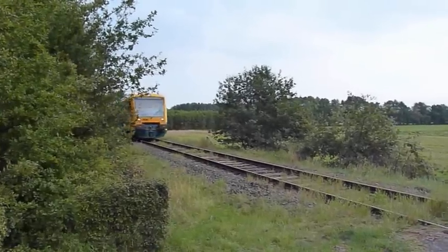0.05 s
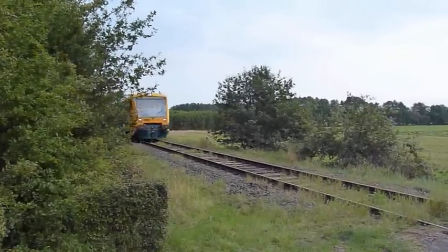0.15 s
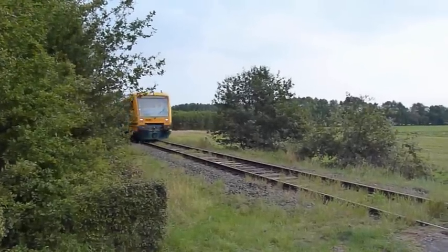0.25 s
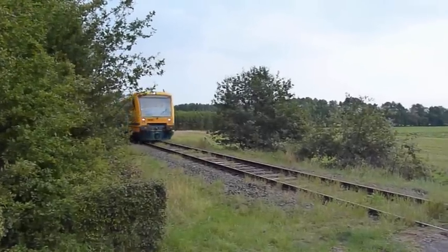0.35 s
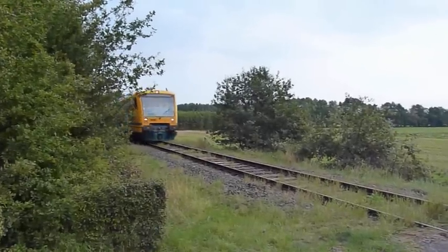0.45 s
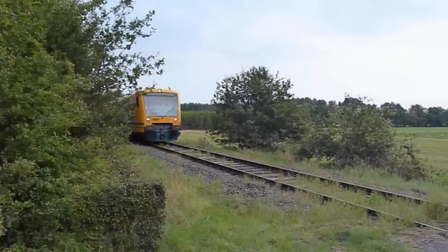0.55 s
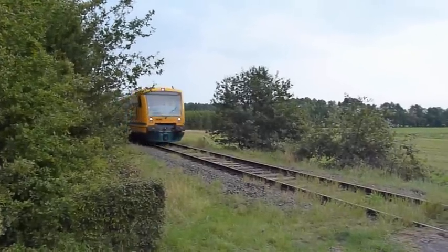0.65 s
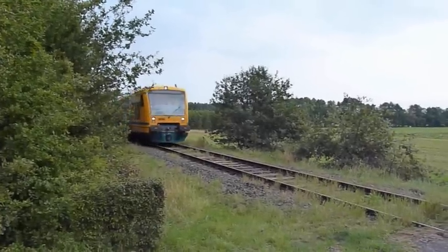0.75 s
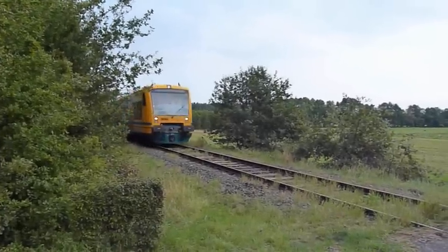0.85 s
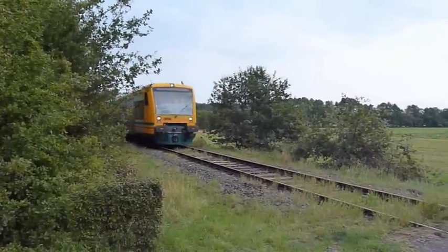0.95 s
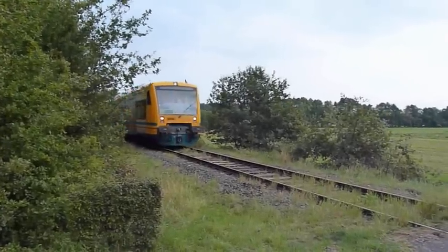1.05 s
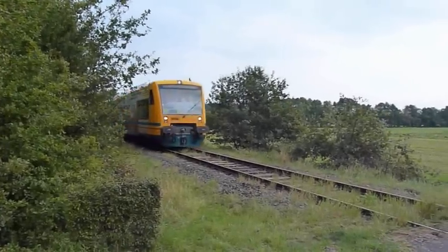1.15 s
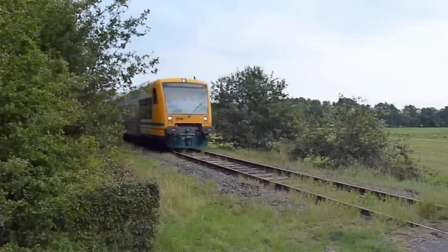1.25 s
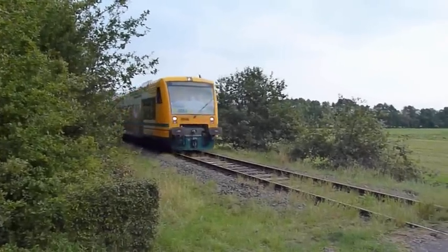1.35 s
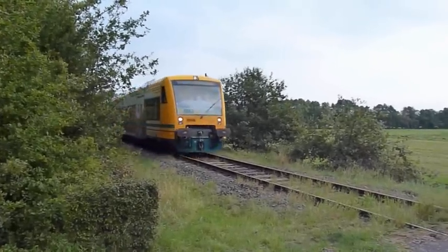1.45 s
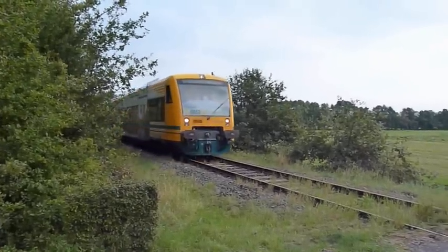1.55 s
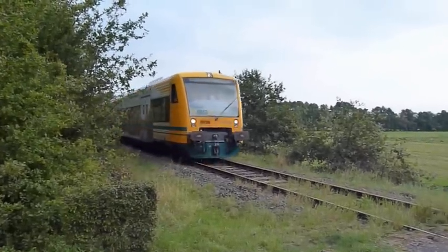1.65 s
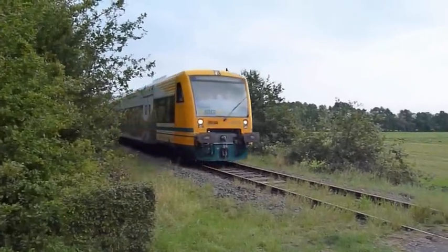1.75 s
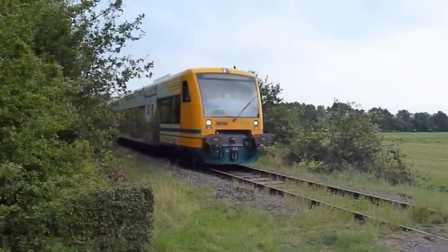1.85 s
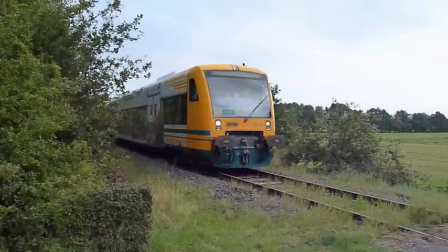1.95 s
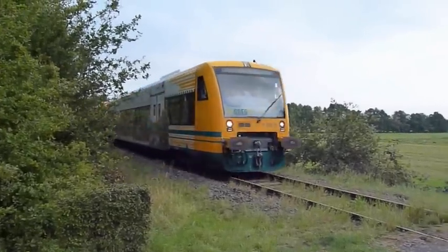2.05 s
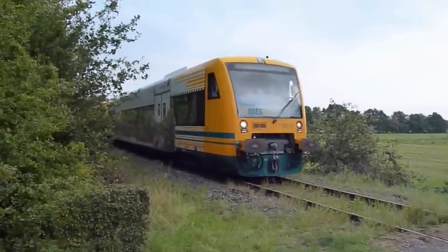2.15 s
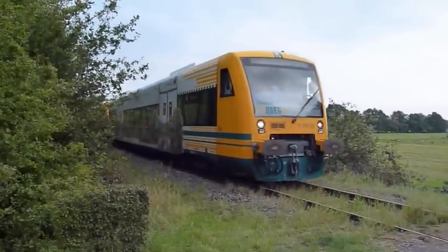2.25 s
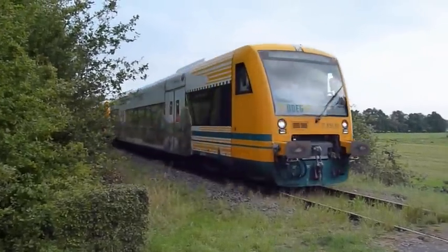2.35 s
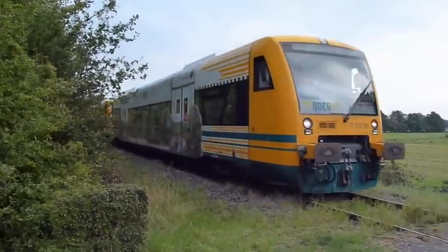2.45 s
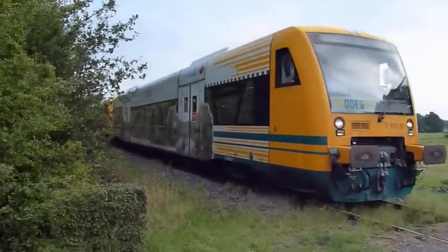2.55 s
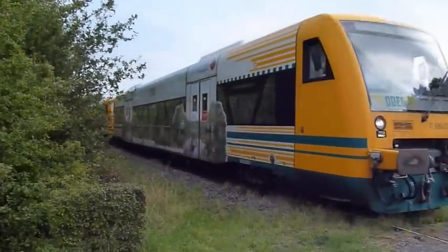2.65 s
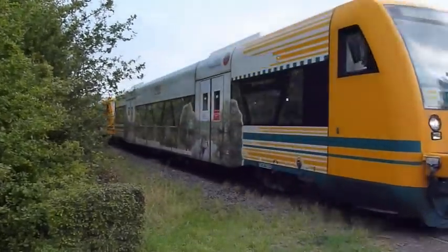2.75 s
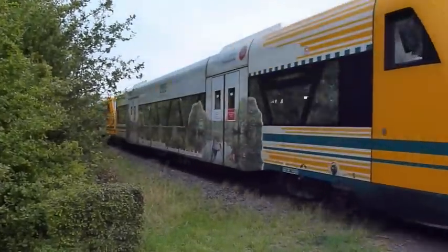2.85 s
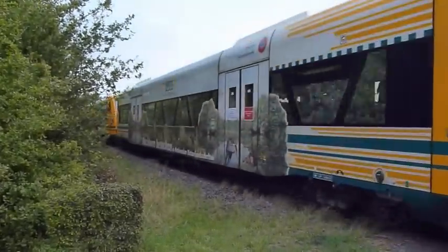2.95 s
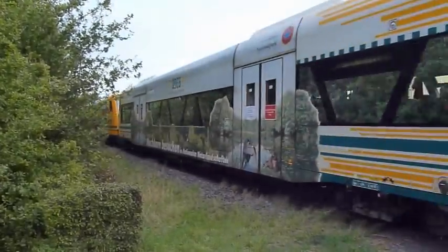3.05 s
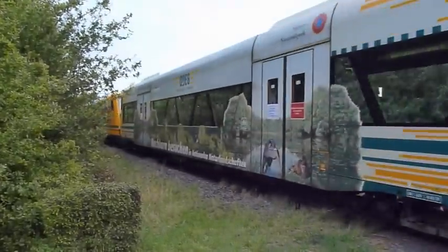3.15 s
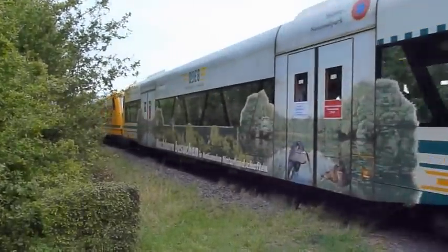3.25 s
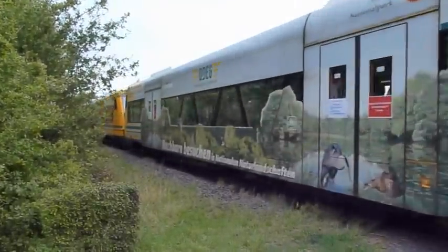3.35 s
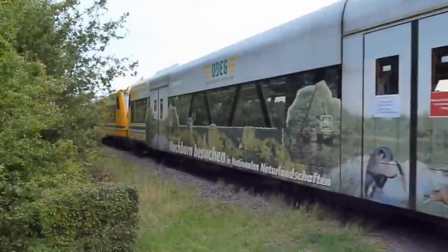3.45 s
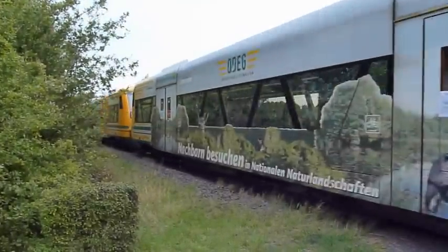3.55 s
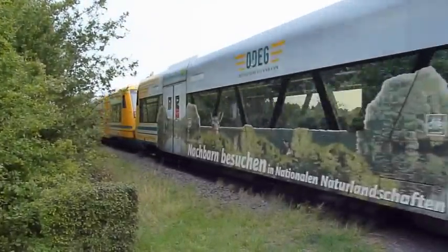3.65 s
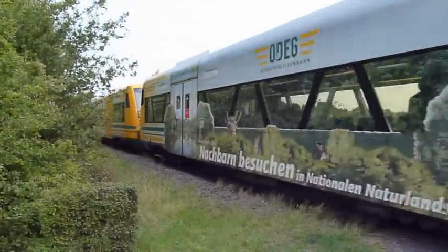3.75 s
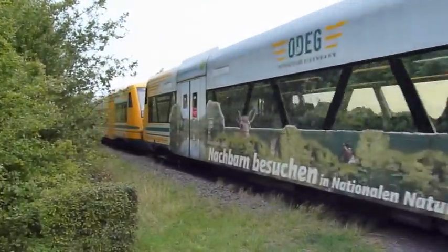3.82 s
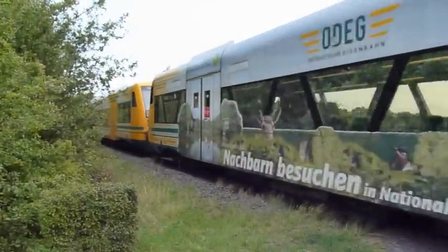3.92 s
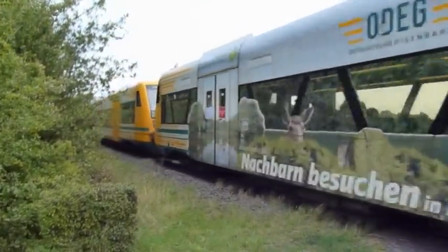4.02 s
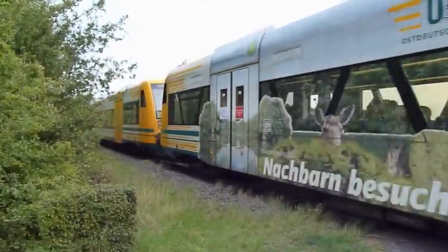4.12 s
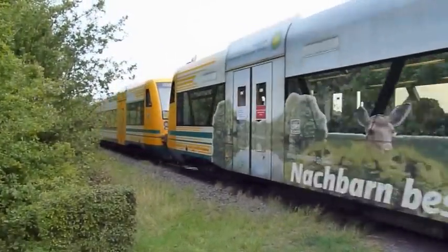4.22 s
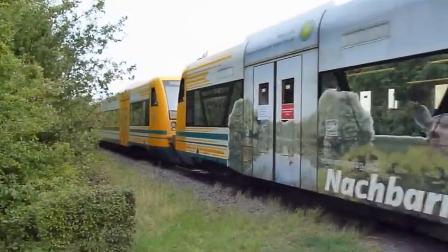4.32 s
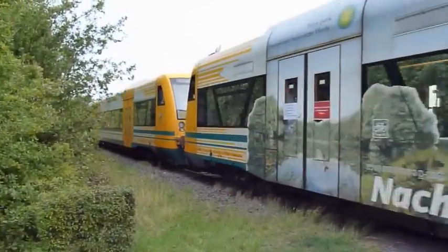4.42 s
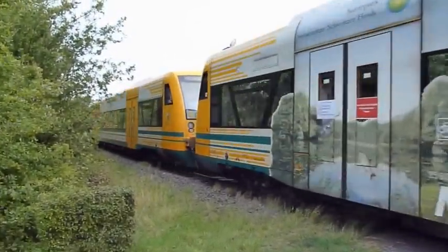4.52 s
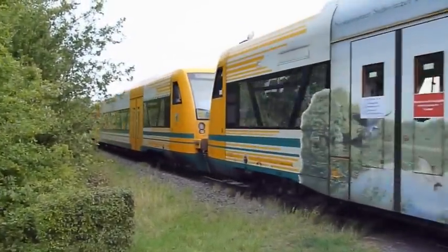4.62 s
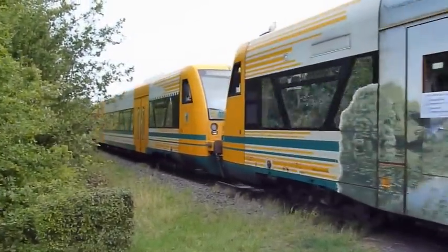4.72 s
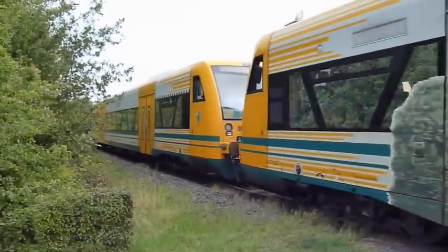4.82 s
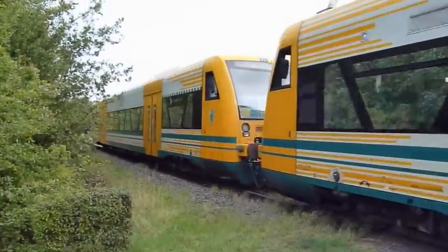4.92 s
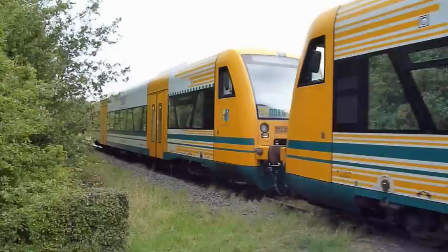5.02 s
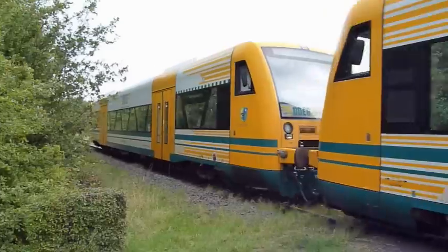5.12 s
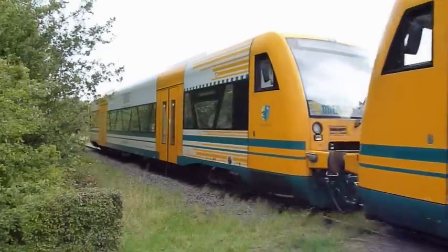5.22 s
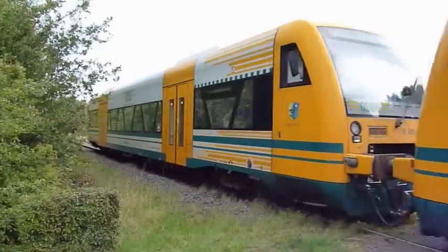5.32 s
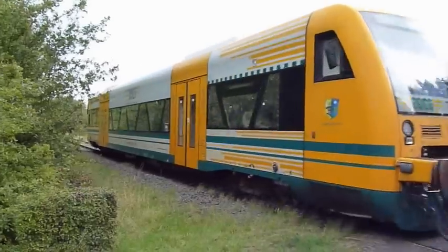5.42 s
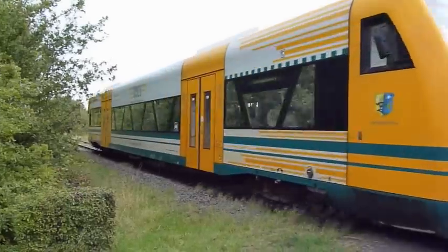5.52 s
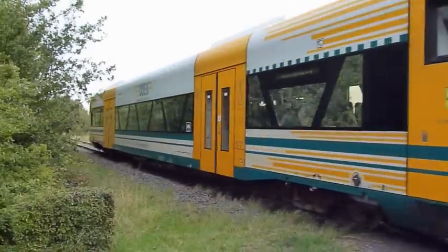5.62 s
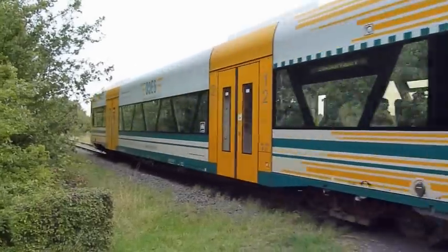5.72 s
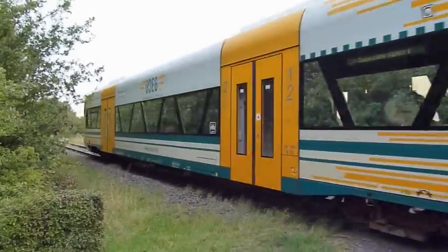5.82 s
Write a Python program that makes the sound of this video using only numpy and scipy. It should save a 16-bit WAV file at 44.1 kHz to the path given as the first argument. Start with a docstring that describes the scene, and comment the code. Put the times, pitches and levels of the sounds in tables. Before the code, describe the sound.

Outdoors beside a rural railway, a camcorder a few metres from the track hears diesel railcars approach from the left. From 0 to 2 s a low throbbing engine drone and pulsing exhaust lie under a growing hollow rail roar, with thin wavering metallic ringing and treble hiss. From about 2.4 s it swells fast, with a high flange scrape building; the front draws level near 3 s and pitch sinks slightly. Between 2.7 and 4.7 s, irregular dull thumps knock in quick succession, with clacks and short, sharp scrapes clustered at 3.1 to 3.8 s. Around 4 s floor panels drum and the engine swells. Near 5 s the next wheels pass with another roar surge, clacks and thumps. From 5.2 to 5.8 s small bright cracks of grit and a faint scrape join the rumble, now towards the right. It ends still loud, the top treble cut off.

```python
"""A rural branch line: two coupled diesel railcars approach and pass a few metres from a camcorder.
Noise shaped by each part's spectrum gives rail roar, sleeper rumble, wheel ring and tread hiss.
Short ringing blows make the thumps; bursts of shaped noise make clacks, scrapes and cracking grit.
Underfloor engines drone beneath as sine lines at multiples of the firing rate, with pulsing exhaust noise.
The train pans from left to right; the camcorder adds three fixed notches and cuts the top treble."""
import sys
import numpy as np
from scipy import signal
from scipy.fft import rfft, irfft
from scipy.io import wavfile
from scipy.ndimage import uniform_filter1d, map_coordinates

SR = 44100
rng = np.random.default_rng(int(sys.argv[2]) if len(sys.argv) > 2 else 0)


def persist_wave(psi):
    """Save psi, clipped to +-1, as 16-bit WAV."""
    counts = np.round(np.clip(psi, -1, 1) * 32767).astype(np.int16)
    wavfile.write(sys.argv[1], SR, np.atleast_2d(counts).T)


N = 259308
TIME = np.arange(N) / SR
FREQS = np.maximum(np.fft.rfftfreq(N, 1 / SR), 1)

SPEED_M_S, TRACK_M = 9.86, 4.82  # speed of the train, distance to the rails
SOUND_M_S = 343
FIRING_HZ = 59.43  # engine firing rate as heard at the start, before it wanders
# Tone colour of rails, sleepers and hiss, far off and alongside: [f/Hz, relative level per Hz/dB]
RAIL_AHEAD = [(380, -21), (460, -6.5), (540, -4), (660, -2), (750, -1.5), (840, -2.5), (900, -8.5),
              (1040, -3), (1170, -9.5), (1330, -9.5), (1600, -27)]
RAIL_BESIDE = [(380, -1.5), (460, -9), (545, 4), (680, -1), (800, 1.5), (900, -1), (975, -0.5), (1100, -3),
               (1205, -4.5), (1330, -14.5), (1600, -22.5)]
SLEEPERS_AHEAD = [(60, -20.5), (105, -7.5), (140, 2), (215, 0), (280, -1.5), (330, -5), (450, -15.5),
                  (700, -33.5)]
SLEEPERS_BESIDE = [(60, -26.5), (105, -11), (160, 0.5), (205, 1), (250, 3), (310, -2), (400, -3.5),
                   (500, -20), (750, -27.5)]
HISS_AHEAD = [(2000, -9.5), (2700, 2.5), (3100, -2), (3500, 0), (4200, -3), (4900, -7.5), (5350, -3),
              (5750, 0), (6400, -7.5), (7600, -15)]
HISS_BESIDE = [(2000, -17), (2800, 3), (3400, -1), (4200, 0.5), (4800, -1), (5150, 1), (5800, -4),
               (6500, -2.5), (7600, -11)]
# Tone colour of wheel webs, exhaust gas and floor panels: [f/Hz, relative level per Hz/dB]
WHEEL_WEB = [(950, -13.5), (1150, 2.5), (1320, -0.5), (1550, -3.5), (1780, -8.5), (2020, -2), (2180, -8.5),
             (2350, -16), (2600, -24.5), (3200, -46.5)]
EXHAUST = [(20, -22), (38, -7), (58, 1), (73, 2.5), (100, -1), (160, -10.5), (300, -25.5), (700, -55)]
FLOOR_PANELS = [(90, -16), (150, 0), (200, -2.5), (260, -15.5), (330, -1.5), (390, 0.5), (470, 0),
                (560, -12), (700, -14)]
# Ringing modes of the wheels: [f/Hz, width/Hz, relative level/dB]
WHEEL_MODES = [(2070, 110, 2), (3030, 78, 0.5), (3960, 49, -2)]
# Narrow ringing of rails and wheels heard ahead of the train: [f/Hz, width/Hz, level/dB]
AHEAD_MODES = [(618, 24, -28), (674, 14, -28.5), (3100, 110, -50), (5440, 100, -48.5)]
# Engine lines: [multiple of the firing rate, relative level/dB]
ENGINE_ORDERS = [(1, 4.5), (1.25, -6.5), (2, -2.5), (2.671, -16), (4, -13), (5, -8)]
# Bogies, each with its engine: [t abreast/s, then base level/dB of rumble, roar, web, hiss, engine]
BOGIES = [(3.02, -22.5, -20.5, -27, -39.5, -39.5), (5.0, -23, -21, -29, -41, -40),
          (5.83, -25.5, -24, -26.5, -39, -41.5)]
# Thumps of worn treads: [t/s, level before a common trim/dB, f where the blow is strongest/Hz]
THUMPS = [(2.70, -10.5, 210), (2.755, -13.5, 240), (3.131, -4.5, 240), (3.352, -4, 262),
          (3.413, -11.5, 230), (3.461, -6.5, 270), (3.536, -5, 231), (3.623, -5.5, 270), (3.766, -3, 210),
          (3.966, -3.5, 320), (4.021, -6, 393), (4.211, -3, 338), (4.266, -5.5, 280), (4.446, -5, 352),
          (4.507, -8.5, 306), (4.701, -6, 215), (5.209, -10.5, 250), (5.244, -8, 296), (5.293, -5.5, 280),
          (5.512, -6.5, 242), (5.565, -8, 358)]
# What a thump rings in bogie and track: [f before detuning/Hz, relative level/dB, t60/s]
BOGIE_MODES = [(155.7, -3, .11), (205, -2, .08), (249.5, -3, .14), (322.8, -1, .11), (391, -2, .08),
               (465, -1, .09), (560, -2, .08), (672, 1, .07)]
# Flange scrapes: [t at lift-off/s, length/s, f at lift-off/Hz, width/Hz, level/dB]
SCRAPES = [(3.35, .95, 5640, 150, -43.5), (3.13, .09, 5950, 600, -47), (3.35, .14, 5250, 300, -46.5),
           (3.35, .4, 2950, 200, -46), (3.465, .06, 5850, 350, -46), (3.558, .07, 5900, 400, -44.5),
           (3.603, .008, 5900, 400, -44), (3.668, .03, 5900, 330, -37.5), (3.693, .025, 6000, 380, -40),
           (3.75, .017, 6150, 520, -34.5), (3.78, .035, 5950, 300, -39), (5.74, .35, 5130, 200, -48)]
# Wheels clacking on the rail head: [t/s, level before the burst's rise and decay/dB]
CLACKS = [(2.712, -18), (2.94, -19), (2.957, -17), (3.012, -18), (3.073, -18), (3.13, -13.5), (3.324, -9),
          (3.527, -13), (3.722, -14), (4.113, -12), (4.691, -13.5), (4.755, -18), (4.857, -13),
          (4.919, -12.5), (4.974, -14.5), (5.12, -13.5), (5.248, -25)]
# Rough patches of rail that make the roar surge: [t at the height/s, half length/s, boost/dB]
SURGES = [(2.948, .026, 1.5), (3.095, 0.034, 1), (3.29, 0.021, 3), (4.68, 0.037, 1), (5.148, 0.039, 3)]
# Parts of body and running gear that boom going by: [t abreast/s, f/Hz, width/Hz, level/dB]
BOOMS = [(3.0, 713, 129.3, -25), (3.6, 251, 59.3, -21), (4.47, 374, 110, -25.5), (4.72, 1247, 169, -27),
         (5.33, 273, 59.4, -23.5), (5.72, 970, 69.6, -28.5)]
# Grit cracking under the wheels: [t/s, f/Hz, level at onset/dB]
TICKS = [(5.213, 7000, -40.5), (5.248, 6500, -37), (5.352, 6200, -39), (5.529, 4900, -32.5),
         (5.634, 4300, -32), (5.668, 5000, -37), (5.69, 6700, -38), (5.705, 5100, -35.5),
         (5.74, 5000, -36.5), (5.794, 4000, -37)]
# Level moves of the wheels' singing: [t/s, level/dB]
WHEEL_LEVEL = [(3.05, -1.5), (3.32, -2), (3.39, -2), (3.79, -2.5), (3.89, 2.5), (4.45, -1), (4.72, -1.5),
               (5.12, 0.5), (5.42, -1), (5.7, -1.5)]
# Drone level, sinking behind the front skirts, swelling under the first car's rear: [t/s, level/dB]
DRONE_LEVEL = [(.3, 0.5), (1.1, 2), (1.6, 0), (1.95, 2.5), (2.7, -1), (3.0, -2), (3.45, -1.5), (3.75, 2.5),
               (4.1, 0), (4.75, 2), (5.05, 0.5), (5.25, -2), (5.8, 2.5)]
# How much of the left-right bearing each wavelength shows: [f/Hz, share 0-1]
SHADOW = [(250, .03), (800, .3), (1700, .72), (3400, 1)]
# Unlikeness of the two microphone signals: [f/Hz, side minus mid level/dB]
SPREAD = [(50, -21), (130, -30), (300, -31.5), (600, -25), (1000, -18), (1350, -14), (1750, -4.5),
          (2050, -9.5), (2500, -1), (4000, -4), (7000, -3)]
# Microphone sensitivity: [f/Hz, left minus right level/dB]
SHADING = [(50, -.7), (300, -.7), (700, -.6), (1200, -.7), (2000, -.9), (4000, 0)]
# Camcorder notches: [f/Hz, width/Hz]
NOTCHES = [(2600, 330), (4600, 520), (5435, 190)]
# How each part carries: [loss per doubling of distance/dB, level far ahead minus abreast/dB]
SLEEPER_SPREAD = (6.47, -2.6)
RAIL_SPREAD = (5.06, -0.33)
WEB_SPREAD = (5.5, 3.3)
HISS_SPREAD = (4.6, 0.58)
AHEAD_SPREAD = (6.7, 0)
ENGINE_SPREAD = (4.86, 8.8)
BOOM_SPREAD = (34, 0)


def undb(db):
    """Decibels to gain."""
    return 10 ** (np.asarray(db) / 20)


def unit(x):
    """Scale to rms 1."""
    return x / np.sqrt(np.mean(x ** 2))


def across(points):
    """Spread (Hz, value) points over all frequencies, evenly per octave."""
    hz, value = np.transpose(points)
    return np.interp(np.log(FREQS), np.log(hz), value)


def over_time(points):
    """Gain that follows (s, dB) points."""
    return undb(np.interp(TIME, *np.transpose(points)))


def colour(points):
    """Gain of a (Hz, dB) spectrum that falls away beyond its ends."""
    hz = np.transpose(points)[0]
    skirt = np.minimum(FREQS / hz.min(), 1) * np.minimum(hz.max() / FREQS, 1)
    return undb(across(points)) * skirt ** 4


def resonance(hz, width):
    """Gain of a single steep-sided resonance."""
    return 1 / (1 + ((FREQS - hz) / width) ** 2)


def walk(rate):
    """Random levels held 1 / rate s and smoothed twice; rms 1."""
    k = int(SR / rate)
    steps = np.repeat(rng.standard_normal(N // k + 1), k)
    smooth = uniform_filter1d(uniform_filter1d(steps, k), k)
    return unit(smooth[:N])


def radiate(gain, drive=1):
    """Random force through a response; short waves reach the two microphones unalike."""
    noise = rng.standard_normal((2, N)) * drive
    mid, side = rfft(noise) * gain
    side = side * undb(across(SPREAD))
    return irfft(np.array([mid + side, mid - side]), N) / np.std(irfft(mid, N))


def glide(x, factor):
    """Shift all frequencies of both channels by a changing factor."""
    read_at = np.cumsum(factor) % (N - 1)
    return np.array([map_coordinates(ear, [read_at], order=3) for ear in x])


def along(abreast_s):
    """Metres travelled past the camcorder, one row per source."""
    return SPEED_M_S * (TIME - np.reshape(abreast_s, (-1, 1)))


def go_by(abreast_s, db, spread):
    """Joint gain of moving sources: each weakens with distance and throws its sound ahead or behind."""
    fall_db, ahead_db = spread
    metres = along(abreast_s)
    distance = np.hypot(metres, TRACK_M)
    loss_db = fall_db * np.log2(distance / TRACK_M)
    gain = undb(np.reshape(db, (-1, 1)) - loss_db - ahead_db * metres / distance)
    return np.sqrt(np.sum(gain ** 2, axis=0))


def doppler_shift(abreast_s, recede=.65):
    """Pitch sinks as the front draws level; wheels still to come then hold it up."""
    metres, = along(abreast_s)
    return 1 - SPEED_M_S / SOUND_M_S * np.minimum(metres / np.hypot(metres, TRACK_M), recede)


def nearness_of_colour(centre_s=3.46, rise_s=0.74, far=0.064, near=0.88):
    """Share of the alongside colour, rising gently as the train reaches the near track."""
    return far + (near - far) * (1 + np.tanh((TIME - centre_s) / rise_s)) / 2


def passing(ahead, beside, share, drive):
    """Crossfade, at equal power, from the far-off colour to the alongside one."""
    far = np.sqrt(1 - share) * radiate(colour(ahead), drive)
    return far + np.sqrt(share) * radiate(colour(beside), drive)


def contact(rough_db=0.5, grit_db=0.78):
    """Strength of the wheel-rail force: it shakes slowly and quickly on rough steel."""
    return undb(rough_db * walk(23.66) + grit_db * walk(300))


def sleeper_rumble(share, force, lump_db=-0.1, drift=.07):
    """Unevenly bedded sleepers rumble in slight lumps and with wandering pitch."""
    lumpy_force = force * undb(lump_db * walk(25))
    rumble = passing(SLEEPERS_AHEAD, SLEEPERS_BESIDE, share, lumpy_force)
    return glide(rumble, 1 + drift * walk(12))


def surges():
    """Gain of the rail roar: it swells briefly on each rough patch."""
    return undb(sum(db * np.exp(-((TIME - s) / half) ** 2) for s, half, db in SURGES))


def rail_roar(share, force):
    """Rough wheels shake the rails into a broad roar that surges on rough patches."""
    return surges() * passing(RAIL_AHEAD, RAIL_BESIDE, share, force)


def wheel_webs(force):
    """The contact force shakes the wheel webs into a mid-treble noise."""
    return radiate(colour(WHEEL_WEB), force)


def tread_hiss(share, force):
    """The wheel-rail contact gives off a treble hiss whose colour changes on approach."""
    return passing(HISS_AHEAD, HISS_BESIDE, share, force)


def wheel_ring(doppler, force, waver_db=-2.0):
    """Narrow wheel modes sing on and sink in pitch as the train draws level."""
    modes = sum(undb(db) * resonance(hz, width) for hz, width, db in WHEEL_MODES)
    return glide(radiate(modes, force), doppler) * undb(waver_db * walk(9.5))


def ringing_ahead(abreast_s, doppler, fade_s=0.69, waver_db=2.5):
    """Narrow rail and wheel modes sound before the train arrives, each wavering, gone once it is level."""
    ahead = np.clip((abreast_s - TIME) / fade_s, 0, 1)
    modes = 0
    for hz, width, db in AHEAD_MODES:
        modes = modes + undb(db + waver_db * walk(5)) * radiate(resonance(hz, width))
    return ahead * go_by(abreast_s, 0, AHEAD_SPREAD) * glide(modes, doppler)


def engines(doppler, wander=.008, load_db=1.5, firing_db=-4.5, gas_db=-1.2):
    """Firing lines that waver with the load, and exhaust noise puffing at the firing rate."""
    rate_hz = FIRING_HZ * doppler / doppler[0] * (1 + wander * walk(14))
    phase = 2 * np.pi * np.cumsum(rate_hz) / SR
    drone = 0
    for multiple, db in ENGINE_ORDERS:
        line = np.sin(multiple * phase + rng.uniform(0, 2 * np.pi))
        drone = drone + undb(db + load_db * walk(10)) * line
    exhaust = radiate(colour(EXHAUST), 1 + .5 * np.cos(phase))
    return undb(firing_db) * unit(drone) + undb(gas_db) * exhaust


def flanges(wheel_db=-7, waver=.008, rise=0.93, lift_s=0.016, chatter_db=3, chatter_per_s=220, sag_per_s=0.073):
    """Flanges press on the rail head, chatter as they stick and slip, sag in pitch and let go quickly."""
    out = 0
    # each scrape also stirs the middle wheel mode
    wheel = undb(wheel_db) * resonance(*WHEEL_MODES[1][:2])
    for s, length, hz, width, db in SCRAPES:
        # rise: share of the length spent building up
        press = np.clip((TIME - s + length) / (rise * length), 0, 1)
        touch = press * np.clip(1 - (TIME - s) / lift_s, 0, 1)
        scrape = radiate(resonance(hz, width) + wheel, undb(chatter_db * walk(chatter_per_s)))
        pitch = 1 + sag_per_s * np.clip(s - TIME, 0, length) + waver * walk(30)
        out = out + undb(db) * touch * glide(scrape, pitch)
    return out


def thumps(push_s=0.0054, knock_db=-4, scatter=0.048, focus_db=6):
    """Worn spots on the treads knock bogie and track into a short ring of slightly detuned modes."""
    out, age = np.zeros(N), TIME[:SR // 4]
    hz, mode_db, t60 = np.transpose(BOGIE_MODES)[:, :, None]
    for s, db, centre in THUMPS:
        detune = 1 + scatter * rng.standard_normal(hz.shape)
        # modes weaken with the square of their octaves from the blow's centre
        size = undb(mode_db - focus_db * np.log2(hz / centre) ** 2)
        tone = np.sin(2 * np.pi * (hz * detune * age + rng.random(hz.shape)))
        ring = (size * np.exp(-np.log(1000) * age / t60) * tone).sum(axis=0)
        ring = ring * (1 - np.exp(-age / push_s))
        blow = ring / np.abs(ring).max() * undb(db + knock_db)
        start = int(s * SR)
        out[start:start + len(age)] += blow[:N - start]
    return out


def clacks(push_s=.005, decay_s=0.016):
    """A wheel drops onto a dent in the rail head: the rail's own colour bursts out and dies quickly."""
    blows = 0
    for s, db in CLACKS:
        age = np.maximum(TIME - s, 0)
        blows = blows + undb(db) * (1 - np.exp(-age / push_s)) * np.exp(-age / decay_s)
    return blows * radiate(colour(RAIL_BESIDE))


def booms(force, shake_db=0.5):
    """Parts of the cars resound in a band of their own, heard only while nearly abreast."""
    out = 0
    for s, hz, width, db in BOOMS:
        shaken = force * undb(shake_db * walk(40))
        out = out + go_by(s, db, BOOM_SPREAD) * radiate(resonance(hz, width), shaken)
    return out


def floor_drum(force, abreast_s=4.02, level_db=-22, spread=(17.3, 0), shake_db=2.0):
    """Floor panels drum as the first car's middle goes by; a steep loss keeps them close-up."""
    return go_by(abreast_s, level_db, spread) * radiate(colour(FLOOR_PANELS), force * undb(shake_db * walk(30)))


def ticks(width_hz=900, decay_s=0.0096, crackle_db=3):
    """A grain of grit bursts under a wheel with a short bright crackle."""
    out = 0
    for s, hz, db in TICKS:
        fade = (TIME >= s) * np.exp(-np.abs(TIME - s) / decay_s)
        out = out + undb(db) * fade * radiate(resonance(hz, width_hz), undb(crackle_db * walk(400)))
    return out


def bearing(abreast_s, pan_db=-7.5, swing_db=11, turn_m=7):
    """Left minus right in dB at full shading: the nearest wheels pull hardest."""
    metres = along(abreast_s)
    nearness = 1 / (metres ** 2 + TRACK_M ** 2)
    return pan_db - swing_db * np.average(metres / np.hypot(metres, turn_m), axis=0, weights=nearness)


def place(x, pan_db):
    """The train sweeps from left to right; the camcorder body shades mostly the short waves."""
    centres, shares = np.transpose(SHADOW)
    out, spectrum = 0, rfft(x)
    for share, band in zip(shares, np.eye(len(shares))):
        ears = undb(share * np.array([pan_db, -pan_db]) / 2)
        ears = ears / np.sqrt(np.mean(ears ** 2, axis=0))  # equal power at every moment
        out = out + irfft(spectrum * across(np.transpose([centres, band])), N) * ears
    return out


def scene(ring_db=-5, ring_beside_db=-6.0):
    """One contact force drives sleepers, panels, rails, wheels and booms; engines and blows join in."""
    abreast_s, rumble_db, rail_db, web_db, hiss_db, engine_db = np.transpose(BOGIES)
    share = nearness_of_colour()
    doppler = doppler_shift(abreast_s[0])
    force = contact()
    singing = over_time(WHEEL_LEVEL)
    treads = go_by(abreast_s, hiss_db, HISS_SPREAD)

    sleepers = go_by(abreast_s, rumble_db, SLEEPER_SPREAD) * sleeper_rumble(share, force)
    rails = go_by(abreast_s, rail_db, RAIL_SPREAD) * rail_roar(share, force)
    webs = singing * go_by(abreast_s, web_db, WEB_SPREAD) * wheel_webs(force)
    hiss = treads * tread_hiss(share, force)
    # the ring stands out most while the wheels are still some way off
    ring = singing * treads * undb(ring_db + ring_beside_db * share) * wheel_ring(doppler, force)
    early_ring = ringing_ahead(abreast_s[0], doppler)
    drone = go_by(abreast_s, engine_db, ENGINE_SPREAD) * over_time(DRONE_LEVEL) * engines(doppler)

    rolling = sleepers + rails + webs + hiss + ring + early_ring
    blows = flanges() + thumps() + clacks() + ticks()
    bodies = booms(force) + floor_drum(force)
    return place(rolling + drone + blows + bodies, bearing(abreast_s))


def record(dry):
    """The right microphone is a little more sensitive; three fixed notches and a steep low-pass follow."""
    shade_db = across(SHADING)
    out = irfft(rfft(dry) * undb(np.array([shade_db, -shade_db]) / 2), N)
    for hz, width in NOTCHES:
        out = signal.lfilter(*signal.iirnotch(hz, hz / width, fs=SR), out)
    # order 12, 0.2 dB ripple, 80 dB stop band, 7590 Hz edge
    low_pass = signal.ellip(12, .2, 80, 7590, fs=SR, output="sos")
    return signal.sosfilt(low_pass, out)


dry = scene()
out = record(dry)
persist_wave(out)
```